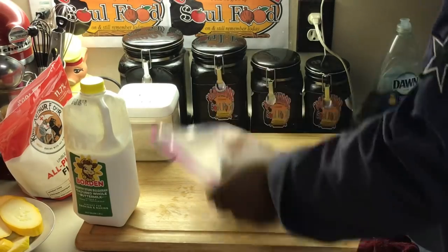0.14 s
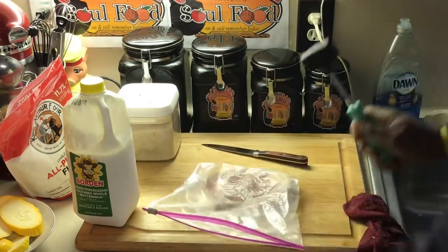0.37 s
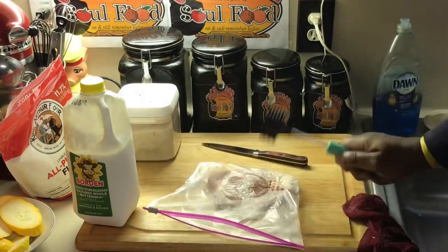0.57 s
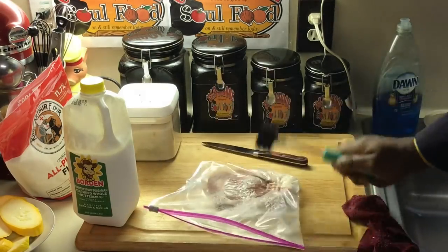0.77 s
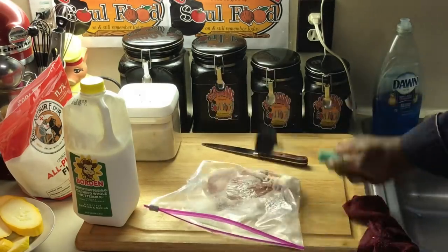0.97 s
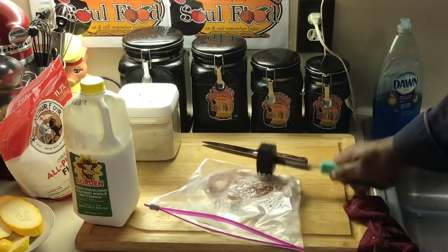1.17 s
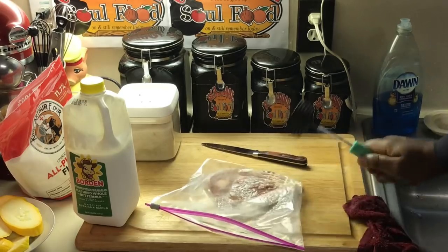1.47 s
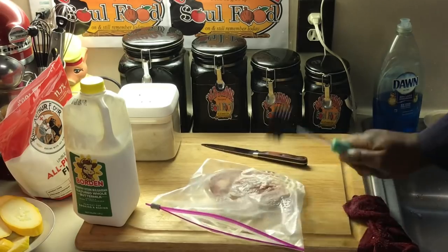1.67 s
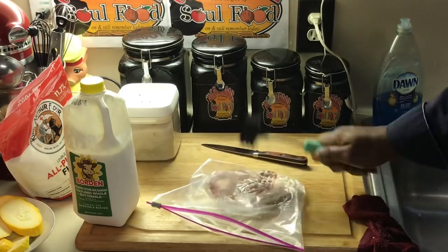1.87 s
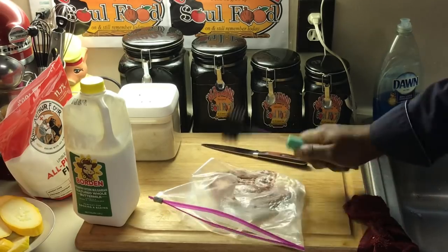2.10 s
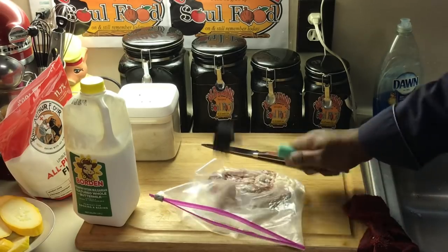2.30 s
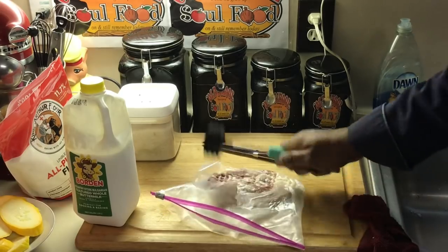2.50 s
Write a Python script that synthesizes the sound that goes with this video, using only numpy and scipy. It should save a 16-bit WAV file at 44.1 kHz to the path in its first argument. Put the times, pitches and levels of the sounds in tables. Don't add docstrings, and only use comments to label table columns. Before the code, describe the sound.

Rapid dull mallet blows on bagged steak, with crackling plastic and a wooden board rattling on the counter

```python
import sys
import numpy as np
from scipy import signal
from scipy.fft import rfft, irfft
from scipy.io import wavfile
from scipy.ndimage import map_coordinates

SR = 44100
rng = np.random.default_rng(int(sys.argv[2]) if len(sys.argv) > 2 else 0)


def decibels_to_gain(level_db):
    exponent = np.asarray(level_db, float) / 20
    return 10 ** exponent


def file_out(sig):
    cols = np.atleast_2d(sig).T
    lim = np.clip(cols, -1, 1)
    pcm = np.round(lim * 32767).astype(np.int16)
    wavfile.write(sys.argv[1], SR, pcm)


N = 116865

# (time [s], peak level [dB], bright share [dB], rise [s], t60 [s])
CRUNCHES = [
    (0.483, -8.5, -10.5, 0.0052, 0.067),
    (0.7149, -11, -12.5, 0.00096, 0.082),
    (0.9237, -6.5, -6, 0.0017, 0.035),
    (1.1444, 1, -13.5, 0.0022, 0.023),
    (1.349, -12.5, -13, 0.0076, 0.11),
    (1.5684, -11.5, -10, 0.0041, 0.1),
    (1.7903, -2.5, -12.5, 0.0047, 0.048),
    (2.0049, -3, -7.5, 0.002, 0.044),
    (2.224, -8, -9, 0.0034, 0.061),
    (2.437, -8, -10, 0.0018, 0.06),
]
# (time of deepest dip [s], counter level [dB], board re counter [dB], slap level [dB])
THUDS = [(0.5072, -15.5, -4.5, -7), (0.7365, -15, -4, -9), (0.9456, -12, -5, -15), (1.1654, -11, -9, -6),
         (1.3768, -16, -2, -14.5), (1.592, -15, -1, -15), (1.8142, -11.5, -5, -11.5),
         (2.0293, -12, -13, -12), (2.25, -15, -17.5, -15.5), (2.4602, -11.5, -11, -16)]


def rms_one(x):
    return x / np.sqrt(np.mean(x ** 2) + 1e-20)


def at_hz(points, hz):
    table_hz, value = np.array(points).T
    return np.interp(np.log(hz), np.log(table_hz), value)


def coloured(x, spectrum):
    hz = np.fft.rfftfreq(len(x), 1 / SR) + 1
    gain = decibels_to_gain(at_hz(spectrum, hz)) * np.minimum(1, hz / spectrum[0][0]) ** 2
    return rms_one(irfft(rfft(x) * gain, len(x)))


def filtered(x, order, hz, kind="low"):
    return signal.sosfilt(signal.butter(order, hz, kind, fs=SR, output="sos"), x)


def envelope(start, rise, hold, t60):
    t = np.arange(N) / SR - start
    rise = max(rise, 1e-4)
    return np.clip(t / rise, 0, 1) ** 2 * decibels_to_gain(-60 * np.maximum(t - rise - hold, 0) / t60)


def ring(clicks, hz, t60):
    r, w = decibels_to_gain(-60 / (t60 * SR)), 2 * np.pi * hz / SR
    return signal.lfilter([0, np.sin(w)], [1, -2 * r * np.cos(w), r * r], clicks + 1e-18)


def clicks_at(s, db):
    out = np.zeros(N)
    index = np.clip((np.asarray(s) * SR).astype(int), 0, N - 1)
    np.add.at(out, index, decibels_to_gain(np.asarray(db)))
    return out


def grains(spread_db):
    return rng.standard_normal(N) * decibels_to_gain(spread_db * np.minimum(rng.exponential(1, N), 5))


def bag():
    # (time [s], rise [s], level [dB], t60 [s])
    rustles = [
        (0.0, 0.00047, -48.5, 0.1),
        (0.082, 0.0055, -42, 0.12),
        (0.1755, 0.0054, -36, 0.35),
        (0.189, 0.0013, -34, 0.024),
        (0.185, 0.026, -24.5, 0.074),
        (1.218, 0.006, -41, 0.13),
        (2.468, 0.0082, -43, 0.22),
    ]
    # (frequency [Hz], level [dB per Hz])
    film = [(180, -18), (300, -12), (528, -14.5), (1030, -8), (1100, -11.5), (1510, -8), (6300, -9.5),
            (16000, -27)]
    # (frequency [Hz], level [dB per Hz])
    crunch_colour = [(240, -79), (400, -13), (777, -5.5), (1710, -9.5), (4440, -3), (4800, -7),
                     (6440, -3.5), (12500, -15), (16000, -17.5)]
    crunch_db, hold_s, split_hz = -8.5, 0.0015, 5500
    settle_db, bright_settle_db, settle_t60_s = -13.5, -26.5, 0.11

    dull = filtered(coloured(grains(spread_db=5.0), crunch_colour), 2, split_hz)
    bright = rms_one(filtered(coloured(grains(spread_db=1.5), crunch_colour), 2, split_hz, "high"))
    out = 0
    for s, db, bright_db, rise, t60 in CRUNCHES:
        settle = envelope(s, rise, hold_s, settle_t60_s)
        dull_shape = envelope(s, rise, hold_s, t60) + decibels_to_gain(settle_db) * settle
        bright_shape = envelope(s, 0.5 * rise, 0.00042, t60) + decibels_to_gain(bright_settle_db) * settle
        burst = dull * dull_shape + decibels_to_gain(bright_db + 5) * bright * bright_shape
        out = out + decibels_to_gain(db + crunch_db) * burst
    handling = sum(decibels_to_gain(db) * envelope(s, rise, 0.003, t60) for s, rise, db, t60 in rustles)
    return out + handling * coloured(grains(spread_db=3.5), film)


def thuds():
    # (frequency [Hz], level [dB], t60 [s], swell [s])
    low_modes = [(61.4, 0.5, 0.2, 0.0042), (103.7, -3.5, 0.19, 0.0049), (77.4, -1, 0.15, 0.016),
                 (201, 10, 0.11, 0.011), (231.2, -0.5, 0.32, 0.041), (343.8, 4.5, 0.079, 0.0085),
                 (236, -25, 0.41, 0.06)]
    cycles_to_dip = [.47, 1.58, 1.52, 1.67, 1.68, 2.6, 1.7]
    # (time of deepest dip [s], counter level [dB], board re counter [dB], slap level [dB])
    landing = (.230, -30, -12, 0)
    level_spread_db, pitch_spread = 2.0, 0.02

    out, t = np.zeros(N + SR), np.arange(SR // 2) / SR
    chance = rng.normal(0, 1, (len(THUDS) + 1, len(low_modes)))
    for (s, counter_db, board_db, _), vary in zip(list(THUDS) + [landing], chance):
        for k, (hz, db, t60, swell) in enumerate(low_modes):
            pitch = hz * (1 + pitch_spread * vary[k - 1])
            start = int((s - cycles_to_dip[k] / hz) * SR)
            mode_db = counter_db + db + (k > 2) * board_db + level_spread_db * vary[k]
            level = decibels_to_gain(mode_db - 60 * t / t60) * (1 - np.exp(-t / swell))
            out[start:start + len(t)] += level * np.sin(2 * np.pi * pitch * t)
    return out[:N]


def board():
    # (time [s], peak level [dB], low ring re peak [dB])
    slaps = [(0.4962, -5, -13), (0.535, -2, 3.5), (0.5516, -30, -14), (0.581, -16, 8.5),
             (0.6996, -34, 18.5), (0.7207, -6.5, 2), (0.7492, -8.5, -6), (0.7816, -20, 6.5),
             (0.9338, -3, 4.5), (0.969, -11, 5), (1.0114, -10, 2), (1.091, -44, 8), (1.156, -15, 8.5),
             (1.1896, -5, 7.5), (1.2138, -15, 0), (1.254, -31.5, 16), (1.3635, -4, -5), (1.3937, -14, 5),
             (1.4151, -10, 1), (1.431, -19.5, 2), (1.52, -37, 10), (1.583, -4.5, 0.5), (1.6092, -11, -9),
             (1.6276, -16.5, 7.5), (1.803, -8, -4.5), (1.8385, -6.5, 5), (1.8562, -14.5, 10.5),
             (1.8836, -35, 12), (1.929, -39, 0), (2.021, -11.5, -1), (2.0472, -8, 1.5), (2.069, -16, 9.5),
             (2.082, -20.5, 12), (2.142, -30.5, 11.5), (2.2315, -8, 4), (2.257, -12.5, 3.5),
             (2.271, -20, 12), (2.301, -39, 10), (2.447, -7, 6), (2.461, -26, 12), (2.5015, -12.5, 5),
             (2.53, -26, 15.5), (2.57, -36, 22.5)]
    # (level [dB], t60 [s])
    shakes = [(-11, 0.33), (-10, 0.27), (-14, 0.36), (-15.5, 0.38), (-9.5, 0.24), (-11, 0.26),
              (-11.5, 0.25), (-17, 0.28), (-12, 0.17), (-12, 0.37)]
    # (frequency [Hz], level [dB], t60 [s])
    board_low = [(601, -11.5, 0.23), (670, -9, 0.099), (703, -8, 0.086), (775, -5, 0.16), (836, 2.5, 0.13),
                 (877, -9, 0.35), (984, -3, .2), (1083, -8, 0.22), (1149, -14.5, 0.53), (1316, -5, 0.15),
                 (1318, -10, 0.072)]
    # (frequency [Hz], level [dB], t60 [s])
    long_ring = [(832, -22, 1.0), (856, -20, 1.1), (977, -22, .9)]
    # (frequency [Hz], level [dB], t60 [s])
    board_high = [(1630, 0, 0.48), (1874, -1.5, 0.34), (2070, -11, 0.18), (2380, -3.5, 0.37),
                  (2690, -6, 0.36), (3220, 4, 0.15), (3670, -29, 0.11), (3890, 0, 0.18), (4580, -28, 0.051)]
    slap_db, slap_lead_s = -7.5, 0.011
    low_db, high_db, snap_db, crack_db, body_db = -15, -16, 10, -5.5, -21
    rattle_per_s, rattle_db, rumble_db = 1500, -26, 37
    chatter_s, detune, wood_top_hz = 0.0066, 0.015, 4170

    s, db, ring_db = np.transpose(slaps)
    blow_s, _, _, blow_db = np.transpose(THUDS)
    hit_s = blow_s - slap_lead_s
    shake = sum(decibels_to_gain(d) * envelope(t, 0.0063, 0.031, t60) for t, (d, t60) in zip(hit_s, shakes))
    rattle = decibels_to_gain(rattle_db) * shake * grains(spread_db=1.5) * (rng.random(N) < rattle_per_s / SR)

    crack = sum(decibels_to_gain(d + crack_db) * envelope(t, 0.0003, 0.00089, 0.037) for t, d in zip(s, db))
    crack = crack * rng.standard_normal(N)
    body = sum(decibels_to_gain(d + body_db) * envelope(t, 0.00071, 0.004, 0.07) for t, d in zip(s, db + ring_db))
    body = body * rng.standard_normal(N)
    snap = clicks_at(s, db + snap_db)
    out = filtered(crack + 0.95 * rattle + snap, 2, [2250, 4600], "band")
    out = out + decibels_to_gain(-5.5) * filtered(crack + 0.8 * rattle + snap, 2, [1150, 2050], "band")
    out = out + filtered(3.8 * body + 1.5 * rattle, 2, [650, 1400], "band")
    out = out + decibels_to_gain(rumble_db) * filtered(rattle, 2, [130, 420], "band")

    chatter = decibels_to_gain(-60 * np.arange(600) / SR / (7 * chatter_s)) / np.sqrt(chatter_s * SR / 2)
    low_hits = clicks_at(s, db + ring_db + low_db) + clicks_at(hit_s, blow_db + slap_db)
    high_hits = clicks_at(s, db + high_db)
    starts = [int(row[0] * SR) for row in CRUNCHES] + [N]
    # (hits, modes, share of the listed t60 that the wood itself rings, rattle level [dB])
    groups = ((low_hits, list(board_low) + list(long_ring), 0.19, 3.0),
              (high_hits, board_high, 0.086, -10.0))
    for hits, modes, t60_share, drive_db in groups:
        spread = signal.fftconvolve(hits, chatter)[:N]
        for hz, mode_db, t60 in modes:
            force = (spread + decibels_to_gain(drive_db) * rattle) * rng.standard_normal(N) + 0.37 * hits
            shifts = rng.normal(0, detune, len(CRUNCHES)) * min(1, 0.2 / t60)
            for a, b, shift in zip(starts, starts[1:], shifts):
                push = np.r_[force[a:b], np.zeros(SR // 5)]
                rung = ring(push, hz * (1 + shift), t60_share * t60)[:N - a]
                out[a:a + len(rung)] += decibels_to_gain(mode_db) * rung
    return filtered(out, 4, wood_top_hz)


def knife():
    # (time [s], peak level [dB], ring re peak [dB])
    ticks = [(0.561, -38, 5), (0.6903, -49, 4), (0.862, -60, 8), (1.011, -32, -7), (1.225, -25, -1),
             (1.5194, -48, -13), (1.8385, -24, -14), (1.9194, -49, -17), (2.136, -33.5, -15),
             (2.4747, -24.5, 0), (2.553, -39, -5)]
    # (frequency [Hz], level [dB], t60 [s])
    blade = [(8160, -18, .12), (12700, -24, 0.1), (14900, -17, .1)]
    tick_db = -9.5

    s, db, ring_db = np.transpose(ticks)
    modes = sum(ring(clicks_at(s, db + ring_db + mode_db), hz, t60) for hz, mode_db, t60 in blade)
    scratch = sum(decibels_to_gain(d + tick_db) * envelope(t, 0.0007, 0.0011, 0.048) for t, d in zip(s, db))
    return modes + scratch * signal.lfilter([1, -0.55], [1], rng.standard_normal(N))


def kitchen(x):
    # (frequency [Hz], t60 [s])
    room_t60 = [(100, 0.73), (500, 0.32), (2000, 0.3), (6000, 0.28), (15000, 0.23)]
    edges = 25 * 2 ** np.arange(0, 9.6, 0.5)
    room_db, sway_s, sway_hz = -11, 1e-4, 30

    t, out = np.arange(SR // 2) / SR, np.zeros(N + SR)
    starts = [0] + [int(row[0] * SR) for row in CRUNCHES] + [N]
    echo = 0
    for low, high in zip(edges, edges[1:]):
        noise = rng.standard_normal((len(starts) - 1, len(t)))
        decay = decibels_to_gain(-60 * t / at_hz(room_t60, np.sqrt(low * high)))
        echo = echo + filtered(noise, 2, [low, high], "band") * decay
    echo = echo * np.clip(t / 0.00062, 0, 1)
    for a, b, pattern in zip(starts, starts[1:], echo):
        wet = signal.fftconvolve(x[a:b], pattern / np.sqrt(np.sum(pattern ** 2)))
        out[a:a + len(wet)] += wet
    sway = sway_s * SR * rms_one(filtered(rng.standard_normal(N), 2, sway_hz))
    return decibels_to_gain(room_db) * map_coordinates(out, [np.arange(N) + sway], order=3)


def room_tone():
    # (frequency [Hz], level [dB per Hz])
    air = [(150, -40), (260, 8), (320, 0), (355, 7.5), (7120, -9), (16000, -27)]
    # (frequency [Hz], level [dB], width [Hz])
    fridge = [(58.3, -49, 3.3), (113.7, -50, 4.2), (219, -60.5, 25)]
    air_db = -58

    out = decibels_to_gain(air_db) * coloured(rng.standard_normal(N), air)
    for hz, db, width in fridge:
        t60 = np.log(1000) / np.pi / width
        out = out + decibels_to_gain(db) * rms_one(ring(rng.standard_normal(N), hz, t60))
    return out


def scene():
    near = bag() + board() + knife()
    low = thuds()
    echo = kitchen(near + 0.3 * low)
    return (near + low + echo + room_tone())[None]


def band_limit(x):
    return signal.sosfilt(signal.butter(12, 16990, fs=SR, output="sos"), x)


def record(dry):
    mic_low_hz, ceiling, cutoff_hz = 40, 0.72, 16900
    top_hz, above_top_db = 16000, -20

    x = filtered(dry, 4, mic_low_hz, "high")
    x = ceiling * np.tanh(x / ceiling)
    x = signal.sosfilt(signal.cheby2(10, 60, cutoff_hz, fs=SR, output="sos"), x)
    below = signal.sosfilt(signal.cheby2(16, 50, top_hz, fs=SR, output="sos"), x)
    above = filtered(x, 8, top_hz, "high")
    return band_limit(below + decibels_to_gain(above_top_db) * above)


dry = scene()
out = record(dry)
file_out(out)
```